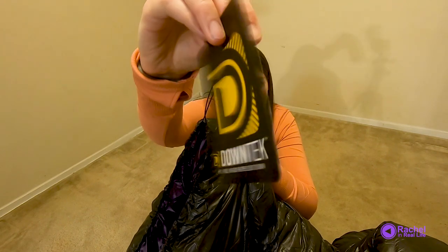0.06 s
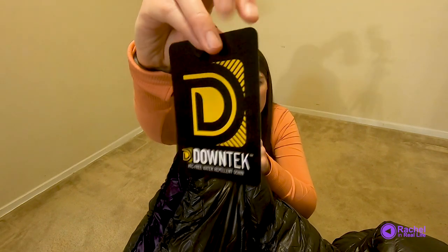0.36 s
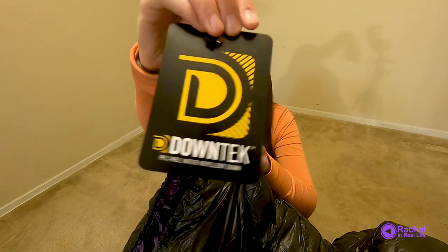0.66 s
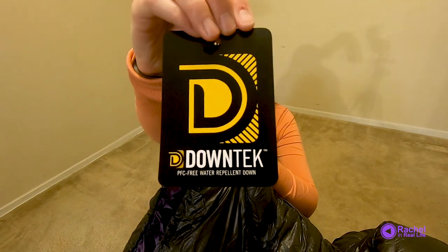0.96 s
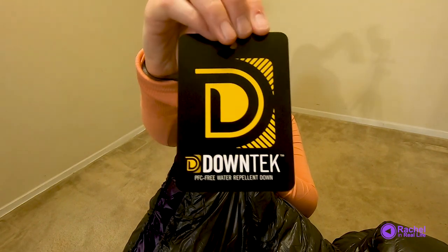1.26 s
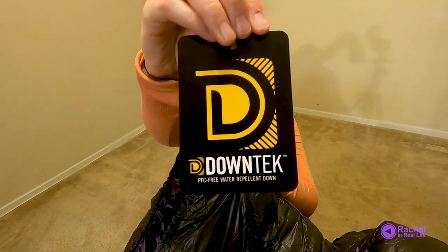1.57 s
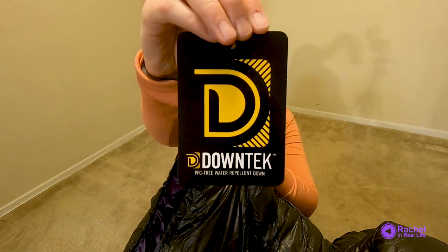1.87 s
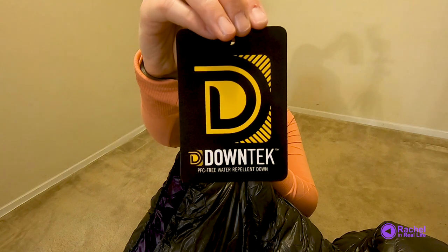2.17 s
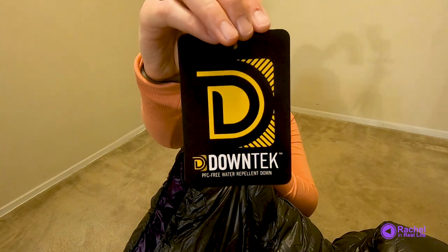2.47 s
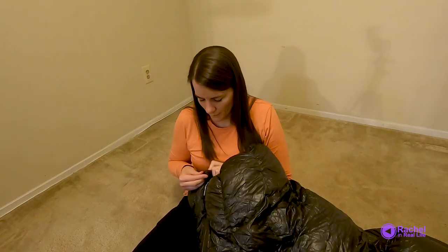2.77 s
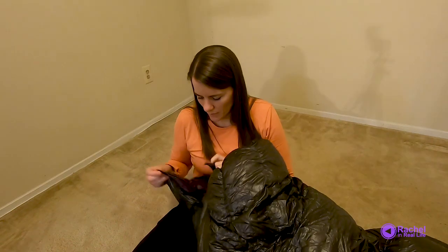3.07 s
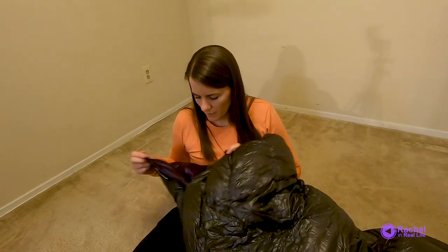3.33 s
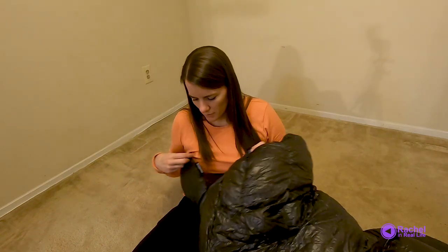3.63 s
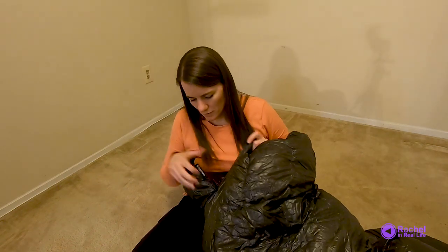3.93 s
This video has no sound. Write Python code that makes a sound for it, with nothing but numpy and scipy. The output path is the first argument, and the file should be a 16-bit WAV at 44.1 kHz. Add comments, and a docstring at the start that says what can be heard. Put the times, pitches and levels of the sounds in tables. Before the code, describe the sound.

Fingers turn a card tag close to the microphone, making dull flexing thumps and light ticks. Then a down jacket rustles faintly farther off, with one crisp snap and a few small clicks, in a quiet room.

```python
"""A card hang tag wobbles, scrapes and ticks as fingers turn it right at the microphone.
The card rings in its low bending modes, and the moving hand pushes air against the capsule.
Farther back in the quiet carpeted room a nylon down jacket rustles softly; one fastener snaps shut
and the bare walls answer. Faint mains hum and hiss lie under it all."""
import sys
import numpy as np
from scipy import signal
from scipy.fft import rfft, irfft, next_fast_len
from scipy.io import wavfile
from scipy.ndimage import uniform_filter1d, minimum_filter1d, map_coordinates

SR = 44100
rng = np.random.default_rng(int(sys.argv[2]) if len(sys.argv) > 2 else 0)


def dump(signal):
    """Clip the signal to [-1, 1] and save it as 16-bit WAV at the path in sys.argv[1]."""
    limited = np.clip(np.atleast_2d(signal).T, -1, 1)
    pcm = np.round(limited * 32767).astype(np.int16)
    wavfile.write(sys.argv[1], SR, pcm)


N = 176400


def amp(db):
    return 10 ** (np.asarray(db) / 20)


def unit(x):
    return x / np.sqrt(np.mean(x ** 2) + 1e-20)


def along(points, hz):
    """Read (f/Hz, value) points on a log frequency axis."""
    f, values = np.transpose(points)
    return np.interp(np.log(hz + 1), np.log(f + 1), values)


def clock():
    return np.arange(N) / SR


def wander(rate):
    """A smooth random curve, rate knots a second."""
    return map_coordinates(rng.standard_normal(int(N * rate / SR) + 4), [clock() * rate])


def coloured(x, colour):
    """x through a zero-phase filter of (f/Hz, level/dB) points."""
    size = next_fast_len(N + SR // 2)
    gain = amp(along(colour, np.fft.rfftfreq(size, 1 / SR)))
    return irfft(rfft(x, size) * gain, size)[..., :N]


def noise(colour):
    """Coloured noise of rms 1."""
    return unit(coloured(rng.standard_normal(N), colour))


def response(colour, size=2048):
    """The minimum-phase impulse response of a colour."""
    cepstrum = irfft(np.log(amp(along(colour, np.fft.rfftfreq(size, 1 / SR)))))
    cepstrum[1:size // 2] *= 2
    cepstrum[size // 2 + 1:] = 0
    return irfft(np.exp(rfft(cepstrum)))


def impulses(rows):
    """One spike for each (t/s, level/dB) row."""
    times, db = np.transpose(rows)
    return np.bincount(np.round(times * SR).astype(int), amp(db), N)[:N]


def clicks(rows, colour):
    """Dry clicks of one colour at their peak levels."""
    shape = response(colour)
    return signal.fftconvolve(impulses(rows), shape / np.abs(shape).max())[:N]


def friction(colour, rate, spread_db, grain_db):
    """Tiny random slips, rate a second, over a smooth rush; rms 1."""
    sizes = amp(spread_db * np.minimum(rng.exponential(size=N), 4))
    slips = (rng.random(N) < rate / SR) * rng.choice([-1, 1], N) * sizes
    grains = unit(signal.fftconvolve(slips, response(colour))[:N])
    return unit(noise(colour) + amp(grain_db) * grains)


def swells(rows):
    """Envelopes that gain 60 dB over the rise, peak at their time and lose 60 dB over the release."""
    t = clock()
    power = sum(amp(db - 60 * np.maximum((peak - t) / rise, (t - peak) / release)) ** 2
                for peak, db, rise, release in rows)
    return np.sqrt(power)


def card_wobble(attack_s=0.0016):
    """Each flex sets the card's bending modes swinging; the grip sets the pitch."""
    # flexes: t/s, level/dB, f/Hz, loss per overtone/dB
    flexes = [(.004, -21.5, 56.4, 14), (0.025, -25.5, 95, 18), (.371, -17, 74.4, 10.5),
              (0.506, -23, 73.3, 13.5)]
    # bending modes: multiple of the pitch, relative level/dB, t60/s
    modes = [(1, 2.5, 0.19), (1.97, -3, 0.26), (3.1, 8.5, 0.15), (5, -3, .12), (6.1, 6, .09)]
    out = np.zeros(N)
    for start, db, hz, loss_db in flexes:
        t = np.maximum(clock() - start, 0)
        attack = 1 - np.exp(-t / attack_s)
        for k, (multiple, mode_db, t60) in enumerate(modes):
            decay = amp(db + mode_db - k * loss_db - 60 * t / t60)
            out += attack * decay * np.sin(2 * np.pi * hz * multiple * t)
    return out


def card_bending():
    """The card flutters dully around each bend and pops as it buckles."""
    # flutters: t/s, level/dB, rise/s, release/s
    flaps = [(.04, -45, .1, 0.3), (.396, -30.5, 0.15, 0.14)]
    # pops: t/s, peak level/dB
    buckles = [(.3934, -13.5), (.4018, -28.5)]
    # their spectra: f/Hz, level/dB
    flap_colour = [(60, -14), (130, 3.5), (230, 3.5), (320, -1.5), (460, -8), (620, -13), (800, -21),
                   (1100, -34), (2000, -55)]
    buckle_colour = [(30, -6.5), (100, -6.5), (220, -5), (330, -4.5), (460, -9), (700, -20), (1100, -50),
                     (3000, -61)]
    return swells(flaps) * noise(flap_colour) + clicks(buckles, buckle_colour)


def draft(gain_db=10.5):
    """Air stirred by hand and jacket rumbles on the microphone."""
    # gusts: t/s, relative level/dB
    gusts = [(0, -38), (.055, -25.5), (.09, -43), (.32, -39.5), (0.366, -26), (.44, -46), (.6, -35),
             (.8, -46.5), (1.05, -55), (2.9, -60), (3.45, -48), (4, -63.5)]
    # rumble spectrum: f/Hz, level/dB
    colour = [(1, -34), (4, 4.5), (9, 0), (20, -19.5), (40, -21.5), (70, -21), (120, -52), (500, -100)]
    return amp(np.interp(clock(), *np.transpose(gusts)) + gain_db) * noise(colour)


def room_tone(hiss_db=-49.5):
    """Steady mains hum and hiss, the hiss a little wider in the treble."""
    # mains partials: f/Hz, rms level/dB
    partials = [(119.8, -63), (240, -55), (599.5, -67)]
    # hiss spectrum: f/Hz, level/dB
    hiss_colour = [(12, -8.5), (20, 4), (44, -11.5), (70, -12.5), (100, -12.5), (140, -11.5), (200, -17),
                   (280, -14.5), (350, -18), (480, -19), (700, -21), (1500, -24.5), (4000, -28.5),
                   (8800, -33), (15800, -37)]
    # stereo width: f/Hz, side over mid/dB
    width = [(100, -37), (500, -18), (2000, -29.5), (6000, -15.5), (13000, -7)]
    hum = sum(amp(db) * np.sqrt(2) * np.sin(2 * np.pi * hz * clock() + 0.14 * wander(2.1))
              for hz, db in partials)
    side = coloured(noise(hiss_colour), width)
    return hum + amp(hiss_db) * (noise(hiss_colour) + np.array([side, -side]))


def card_scrapes():
    """Fingers slide over the card's face; its edge slips off a fingertip or rubs along it."""
    # strokes of each kind: t/s, level/dB, rise/s, release/s
    slides = [(.078, -47, 0.45, 0.3), (.137, -46.5, .06, 0.071), (.17, -49, 0.089, 0.11),
              (.236, -46, 0.054, 0.38), (.342, -44, 0.11, 0.2), (.6, -49.5, 0.16, .15)]
    slips = [(.067, -30, 0.058, 0.01), (.3715, -22.5, 0.015, 0.01), (.7275, -42.5, 0.0069, 0.045)]
    rubs = [(.351, -36, 0.013, 0.052), (.371, -36.5, 0.076, 0.036), (.505, -35.5, 0.032, 0.042),
            (.703, -48.5, 0.3, 0.3)]
    # their spectra: f/Hz, level/dB
    slide_colour = [(700, -9), (2000, -3), (4500, -5), (7000, -5), (8600, 0.5), (10200, -9), (11500, -6),
                    (13500, -3), (14400, -8), (15800, -8)]
    slip_colour = [(700, -7), (1200, -16), (1900, -15), (2350, -3.5), (3400, -5.5), (4500, 1), (5300, -7.5),
                   (7000, -5), (8000, 4), (9000, 0), (9900, -9), (11500, -8), (13500, -4), (14300, -14),
                   (15800, -11)]
    rub_colour = [(150, -6.5), (400, 1), (1050, -3.5), (1400, -10), (1780, -5), (2200, -6), (3000, -18),
                  (8000, -17.5), (15000, -20.5)]
    sliding = swells(slides) * friction(slide_colour, rate=1400, spread_db=3, grain_db=1)
    slipping = swells(slips) * friction(slip_colour, rate=2500, spread_db=0, grain_db=-3)
    rubbing = swells(rubs) * friction(rub_colour, rate=1600, spread_db=4, grain_db=4)
    return sliding + slipping + rubbing


def card_ticks():
    """Fingernail and string tick on the card."""
    # ticks: t/s, peak level/dB
    ticks = [(.066, -26), (.2688, -35), (.284, -28), (.290, -31), (.5005, -23), (.7064, -12), (.7268, -42)]
    # tick spectrum: f/Hz, level/dB
    colour = [(300, -21), (1000, -19), (1600, -10.5), (3000, -5.5), (4500, -13), (7600, -2.5), (9700, -15),
              (11500, -14), (13400, -10), (14500, -18.5)]
    return clicks(ticks, colour)


def jacket_rustle():
    """Nylon creases in tiny crackles and glides on itself with a bright sheen."""
    # creasing: t/s, relative level/dB
    contour = [(2.55, -60), (2.66, -51.5), (2.725, -48.5), (2.81, -65), (2.95, -54), (3.12, -52.5),
               (3.18, -51), (3.26, -42.5), (3.36, -45), (3.41, -51.5), (3.455, -47), (3.52, -48),
               (3.62, -56.5), (3.72, -55), (3.8, -47.5), (3.86, -52.5), (3.93, -53.5), (4, -59)]
    # glides: t/s, level/dB, rise/s, release/s
    glides = [(2.725, -53, 0.15, 0.24), (3.19, -47.5, 0.27, 0.82), (3.355, -47, 0.46, 0.21),
              (3.805, -60, .2, 0.12), (3.93, -54.5, .25, 0.16)]
    # their spectra: f/Hz, level/dB
    crease_colour = [(150, -7), (350, 7), (700, 1.5), (1100, -4.5), (1800, 1.5), (3000, 0.5), (6800, -5),
                     (8700, -0.5), (10500, -10), (13300, -7.5), (15800, -12)]
    sheen_colour = [(2000, -17), (5000, -6), (7500, -8), (8500, 0.5), (9200, -8), (10500, -14), (13400, -7),
                    (14300, -15), (15800, -14)]
    level_db = np.interp(clock(), *np.transpose(contour), left=-120) + 1.7 * wander(35) - 3
    creases = amp(level_db) * friction(crease_colour, rate=800, spread_db=5.5, grain_db=-3)
    sheen = swells(glides) * friction(sheen_colour, rate=1100, spread_db=5, grain_db=0)
    return creases + sheen


def fastener_snap(smear_hz=6500, smear_width_hz=4500):
    """The fastener's halves meet with a hard crack and a very short ring, smeared by its shell."""
    # contacts: t/s, level/dB
    contacts = [(2.97605, 0.5), (2.97665, -14.5)]
    # crack spectrum: f/Hz, level/dB
    colour = [(100, -35), (250, -11), (520, -10), (1100, -22.5), (1900, -1.5), (2500, -5.5), (3400, 5.5),
              (5000, 2.5), (6800, 1), (8800, 6), (10000, -5), (12000, -8), (13500, -7), (14500, -41),
              (15800, -10)]
    # modes of the halves: f/Hz, relative level/dB, t60/s
    modes = [(510, -32.5, 0.022), (910, -36, 0.011), (1950, -49, 0.0036), (3480, -16, 0.0017),
             (5170, -22.5, 0.01), (6640, -17, 0.0032), (8450, -13.5, 0.0019)]
    t = np.arange(SR // 20) / SR
    ring = sum(amp(db - 60 * t / t60) * np.sin(2 * np.pi * hz * t) for hz, db, t60 in modes)
    snap = clicks(contacts, colour) + signal.fftconvolve(impulses(contacts), ring)[:N]
    # all-pass: the shell passes one band on slightly late
    radius = np.exp(-np.pi * smear_width_hz / SR)
    poles = [1, -2 * radius * np.cos(2 * np.pi * smear_hz / SR), radius * radius]
    return signal.lfilter(poles[::-1], poles, snap)


def jacket_clicks():
    """The jacket's small hard parts click."""
    # clicks: t/s, peak level/dB
    taps = [(3.0805, -28), (3.147, -22), (3.2685, -21.5), (3.4368, -15), (3.458, -27), (3.807, -34),
            (3.995, -28.5)]
    # click spectrum: f/Hz, level/dB
    colour = [(200, 4.5), (700, 3), (1100, -3), (2000, 2.5), (4400, -3), (6000, -5), (8600, 2),
              (10500, -7.5), (15000, -10)]
    return clicks(taps, colour)


def cord_scrape():
    """The cord scrapes through the hem."""
    # pulls: t/s, level/dB, rise/s, release/s
    pulls = [(3.44, -49, 0.021, .08), (3.47, -50, .1, 0.15)]
    # scrape spectrum: f/Hz, level/dB
    colour = [(300, -19), (1500, -19), (2300, -21), (3000, 12), (3500, -8), (4300, 7), (6000, -24),
              (15000, -20)]
    return swells(pulls) * friction(colour, rate=460, spread_db=0, grain_db=0)


def room(x, tail_db=-5.5, build_s=0.0017):
    """Separate wall echoes reach the microphone, with a short tail whose bass lasts longest."""
    # wall echoes: delay/s, relative level/dB
    walls = [(.0055, -10), (.0073, -17), (.0101, -14), (.0133, -13), (.0222, -19), (.0239, -14),
             (.0268, -19), (.0368, -16), (.0377, -21)]
    # spectrum of the reflected sound: f/Hz, level/dB
    colour = [(200, 0), (500, -1), (1100, 9.5), (2000, -1.5), (3500, -4), (5000, -2.5), (6500, -0.5),
              (8500, -10.5), (11000, -8.5), (15000, -9)]
    # reverberation time: f/Hz, t60/s
    t60 = [(200, 0.75), (1500, 0.49), (4500, 0.36), (8000, 0.25), (14000, 0.48)]
    hz, t, bands = signal.stft(rng.standard_normal(SR // 2), SR, nperseg=256)
    envelope = amp(-60 * t / along(t60, hz)[:, None]) * (1 - np.exp(-t / build_s))
    tail = signal.istft(bands * envelope, SR, nperseg=256)[1]
    echoes = impulses(walls)[:len(tail)] + amp(tail_db) * tail / np.linalg.norm(tail)
    return signal.fftconvolve(x, np.convolve(echoes, response(colour)))[:N]


def scene():
    """The tag at the microphone is almost dry; the jacket, farther back, stirs the room."""
    near = card_scrapes() + card_wobble() + card_bending() + card_ticks()
    far = jacket_rustle() + fastener_snap() + jacket_clicks() + cord_scrape()
    return near + far + room(far + amp(-20.5) * near) + draft() + room_tone()


def record(dry):
    """A fast limiter holds the peaks; nothing is kept above the band limit."""
    ceiling, look_ahead_s, top_hz = 0.97, 0.0005, 15850
    width = round(look_ahead_s * SR)
    needed_gain = ceiling / np.maximum(np.abs(dry).max(axis=0), ceiling)
    limited = dry * uniform_filter1d(minimum_filter1d(needed_gain, 2 * width + 1), width)
    size = next_fast_len(N + SR // 2)
    passband = np.fft.rfftfreq(size, 1 / SR) < top_hz
    return irfft(rfft(limited, size) * passband, size)[..., :N]


dry = scene()
out = record(dry)
dump(out)
```